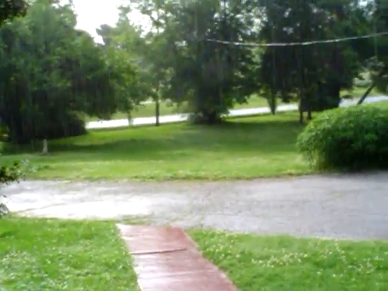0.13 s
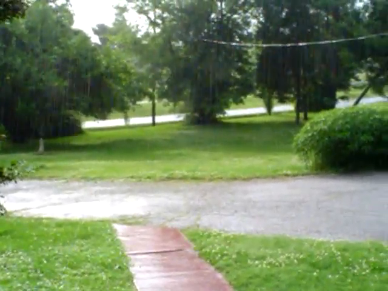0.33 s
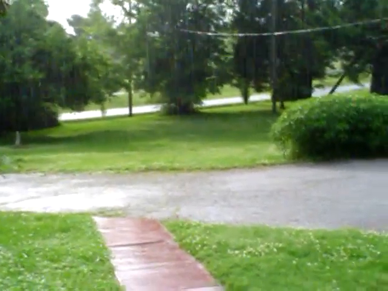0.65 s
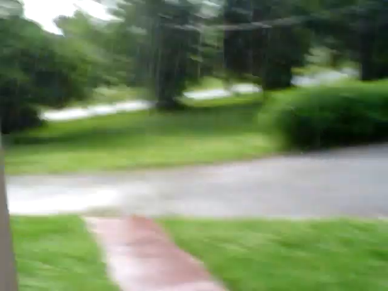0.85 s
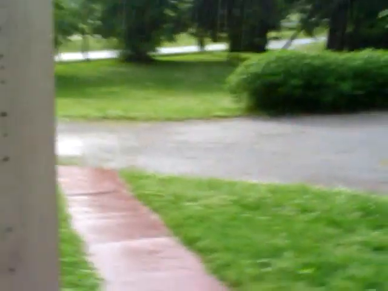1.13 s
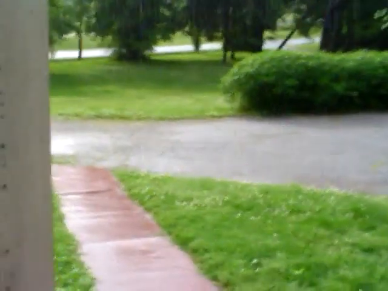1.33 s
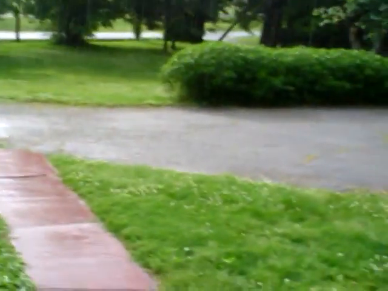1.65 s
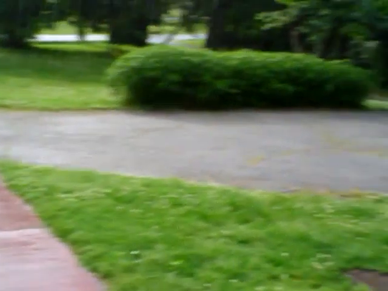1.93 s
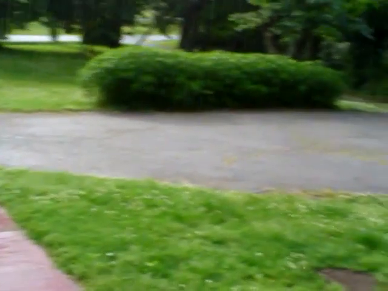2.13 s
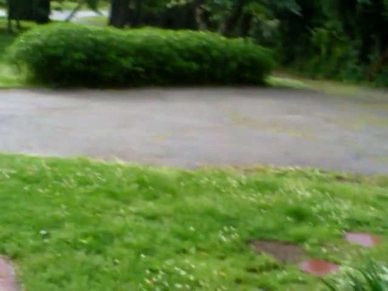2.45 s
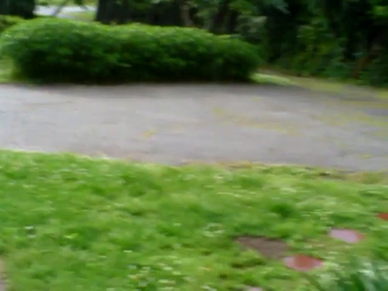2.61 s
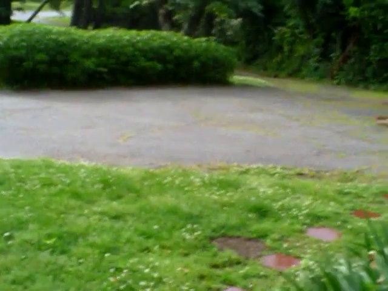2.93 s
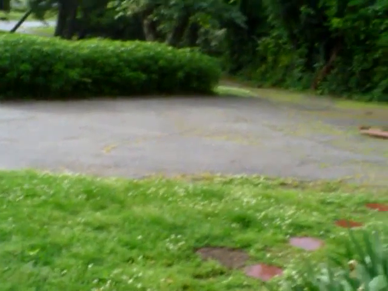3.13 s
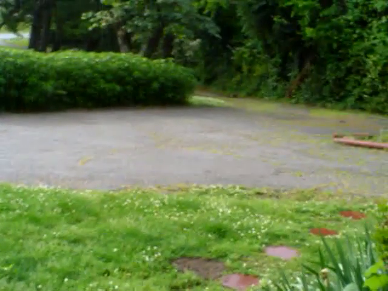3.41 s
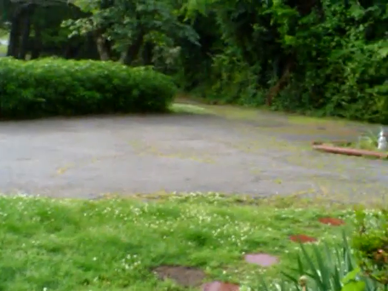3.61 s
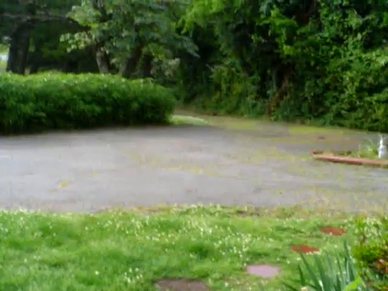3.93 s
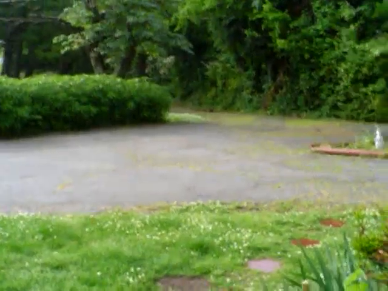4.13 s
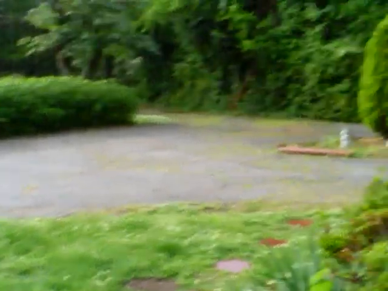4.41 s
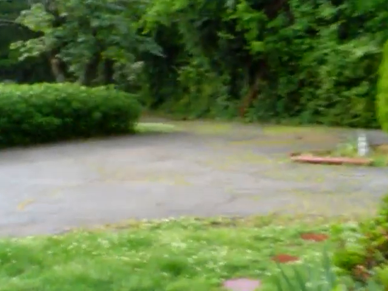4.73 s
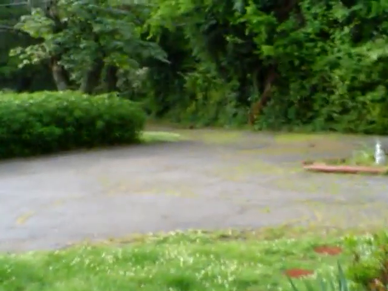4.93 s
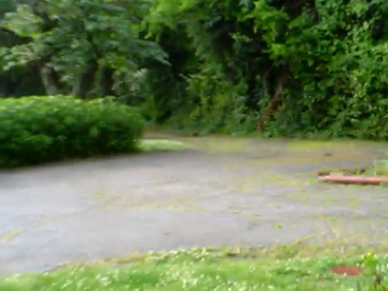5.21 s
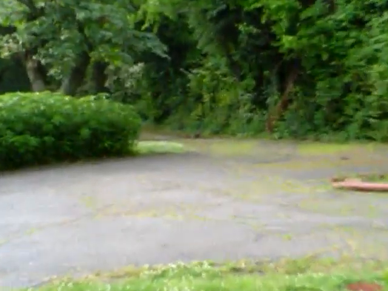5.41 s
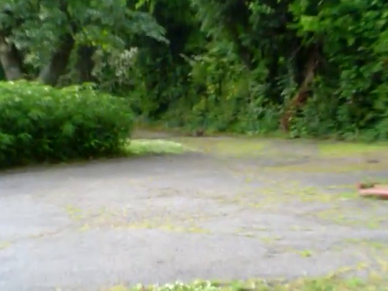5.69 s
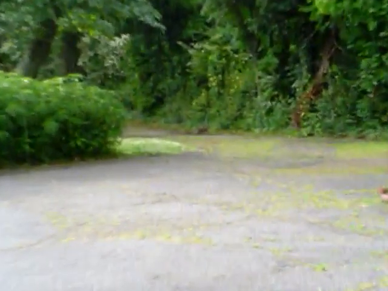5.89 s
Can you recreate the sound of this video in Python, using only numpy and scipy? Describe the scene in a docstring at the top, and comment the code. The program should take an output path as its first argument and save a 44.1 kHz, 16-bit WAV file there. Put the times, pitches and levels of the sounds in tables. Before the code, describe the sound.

Close, slightly dull handheld microphone under a porch in the rain. Continuous even hiss with small irregular ticks and splashes. Within the first second a violent handling pop is followed by a lesser bump; just after one second, something wooden raps once, dry and sharp with a very short tail. Afterwards the rain continues steadily, punctuated by scattered crisp drips and little bursts of spray until the end.

```python
"""Steady rain from a porch

Rain on grass and a paved drive: far drops merge into shaped noise, nearer ones patter as short rings and splashes,
and a few tap close by, with bursts of spray. The camera body is bumped (swinging pulses, trapped air, a click),
something wooden knocks once (decaying modes and noise), and a low sine hum sinks almost to nothing."""
import sys
import numpy as np
from scipy import signal
from scipy.fft import rfft, irfft, next_fast_len
from scipy.io import wavfile
from scipy.ndimage import uniform_filter1d

SR = 44100
rng = np.random.default_rng(int(sys.argv[2]) if len(sys.argv) > 2 else 0)


def master(y):
    """Save y as 16-bit WAV."""
    cut = np.clip(np.atleast_2d(y).T, -1, 1)
    pcm = np.round(cut * 32767)  # scale
    wavfile.write(sys.argv[1], SR, pcm.astype(np.int16))


N = 267136
T = np.arange(N) / SR  # seconds

# Low hum: start_s, pitch_hz, level_db
HUM_GLIDE = [(0, 137, -57), (.55, 139, -51), (1.2, 142, -53.5), (1.6, 143, -57), (2, 143.4, -70)]
# Ringing modes of the wood, balanced against each other: pitch_hz, level_db, t60_s
WOOD_MODES = [(280, -16, 0.095), (515, -17, .05), (640, -6, 0.053), (950, -14, .13), (1200, -12, .035),
              (1370, -7.5, .045), (1585, -7, 0.033), (1868, 1, 0.032), (2230, -11, .06), (2600, -13, .05),
              (2920, -10, 0.046), (3240, -7.5, 0.042), (3690, -13, .04), (4580, -5, .025), (7400, -17, .03)]
# The wooden blow and its bounces: delay_s after the knock, level_db, pitch_hz, t60_s
KNOCK_CONTACTS = [(0, 0, 1410, 0.0052), (.0023, -7, 1810, .012), (.0055, -18, 830, 0.027),
                  (.0095, -17.5, 924, 0.029), (.0245, -22, 1200, .015), (.033, -23, 950, .025)]
# Bumps on the camera body, negative pitch swings inward:
# peak_s, level_db, pitch_hz, rise_s, fall_s, slowing_per_s, air_push_db
BODY_BUMPS = [(.3583, -9.5, -1900, 0.00014, .00015, 1, -70), (.35955, 14, 585, .0004, 0.000087, 6000, -12),
              (.36, -8, -219, .00008, 0.0022, 66, -60), (.695, -10.5, -325, .00115, .002, 290, -60),
              (.3223, -25, -280, .0017, .0015, 1, -60)]
# Ring of the camera case: pitch_hz, level_db, t60_s
CASE_MODES = [(5770, -13, 0.0032), (9400, -11, .006)]
# Colour of the far rain, relative level per Hz: pitch_hz, level_db
RAIN_COLOUR = [(12, -40), (22, -12), (40, -14.5), (65, -9.5), (100, -6.5), (170, -9.5), (300, -5),
               (500, -1), (720, -3.5), (1180, -2), (1600, -4), (2600, -4.5), (3600, -8), (5300, -13.5),
               (6500, -11.5), (8500, -15.5), (10500, -17.5)]
# Slow tilt of the hiss, lifting the upper band as it lowers the lower one: start_s, tilt_db
HISS_TILT = [(0, 0.5), (.75, -1), (1.5, 1.5), (2.2, 1.5), (3, 0.2), (3.7, 0), (4.3, 0.5), (5, -1),
             (6.06, -1.5)]
# Bass of the hiss, of which only the movement about its mean is used: start_s, level_db
BASS_CURVE = [(0.0, -61), (0.34, -56), (0.71, -60), (2.58, -57.5), (3.02, -59), (3.39, -56), (5.53, -59.5),
              (5.74, -57), (6.06, -57)]
# Close drops: start_s, ring_db, pitch_hz, splash_db
CLOSE_DROPS = [(.113, -19.5, 1220, -38), (.189, -19, 2080, -36), (.27, -26, 3010, -29),
               (.284, -26, 1820, -28), (0.3873, -15, 2600, -33), (.3892, -20, 3600, -36),
               (.4738, -13, 1250, -23), (0.4757, -17, 1200, -32), (.54, -17.5, 1200, -36),
               (.5493, -15, 3200, -25), (.664, -20, 2500, -34), (.833, -23, 1210, -27),
               (.923, -19, 1220, -33), (1.247, -18, 2390, -33), (1.3942, -12, 2520, -30),
               (1.474, -20, 1110, -34), (1.985, -19, 1870, -32), (1.9997, -15, 3000, -32),
               (2.119, -26, 4870, -29), (2.135, -18, 2000, -33), (2.251, -21, 1200, -36),
               (2.741, -21, 3080, -30), (2.7683, -14, 6030, -21), (2.816, -21, 2500, -32),
               (2.83, -22, 3000, -34), (2.9735, -17, 1890, -32), (3.1365, -16, 2800, -29),
               (3.1548, -19, 2900, -34), (3.167, -20, 2100, -33), (3.182, -20, 1300, -31),
               (3.244, -19, 1050, -34), (3.7286, -10.5, 2300, -33), (3.741, -20, 1000, -36),
               (3.775, -19, 2360, -32), (3.784, -19, 3500, -32), (4.147, -18, 2550, -32),
               (4.2, -19, 1240, -30), (4.626, -17, 2130, -33), (5.0152, -30, 6840, -28),
               (5.0185, -24, 7000, -27), (5.057, -23, 3500, -36), (5.075, -21, 700, -40),
               (5.372, -22, 1300, -34), (5.384, -20, 1700, -38), (5.396, -20, 1100, -36),
               (5.46, -25, 3500, -32), (5.5265, -19, 1140, -31), (5.538, -17, 2200, -27),
               (5.614, -20, 1960, -33), (5.633, -18, 2500, -30), (5.695, -27, 2200, -30),
               (5.712, -21, 2200, -30), (5.855, -20, 2030, -32)]
# Bursts of spray: start_s, level_db, low_hz, high_hz, t60_s
SPRAY_BURSTS = [(.237, -18, 1100, 3160, 0.078), (.4737, -20.5, 3500, 7000, 0.0092),
                (2.766, -28.5, 4500, 9500, 0.079), (3.133, -31, 1800, 4490, .08),
                (5.36, -28, 1000, 4500, .2), (5.534, -26, 900, 4800, .07), (5.694, -30, 6000, 9900, 0.088),
                (5.85, -32, 1200, 4000, .08)]

KNOCK_S, KNOCK_RING_PEAK_DB, KNOCK_RISE_S = 1.119, -9, .0002
RATTLE_DB, RATTLE_T60_S = -22, 0.12
CRACK_DB, CRACK_T60_S = -17, .022
PORCH_DB, PORCH_T60_S = -32, 0.29
PUSH_RISE_S, PUSH_LEAK_S = 0.0027, 0.017
REBOUND, REBOUND_S = 0.51, 0.03  # share of the air push, decay
CLICK_S, RUSTLE_DB, RUSTLE_DECAY_S = .3563, -17, .0008
HISS_DB = -34  # rms
TILT_UP_HZ, TILT_DOWN_HZ, BASS_TOP_HZ = 1190, 497, 150
PATTER_FLOOR_DB, PATTER_SPREAD_DB = -35, 3.5
PATTER_SPLASH_DB, PATTER_CLUMP_DB = -11, 2.2  # splash against ring, size of the clumping
DROP_T60_S, SPLASH_T60_S = 0.0049, 0.0071  # the drop's ring time is for 2500 Hz
OVERTONE, OVERTONE_DB = 1.44, -8  # second ring of a drop: multiple of the pitch, level against the first
SPRAY_RISE = 0.086  # share of t60
TOP_HZ, CLIP_LEVEL = 10090, 1.04


def undb(db):
    """Decibels to gain."""
    return 10 ** (np.asarray(db) / 20)


def unit(x):
    """Scale to rms 1."""
    return x / np.sqrt(np.mean(x ** 2))


def band(x, lo_hz, hi_hz):
    """Band-pass."""
    edges = [lo_hz, min(hi_hz, .45 * SR)]
    return signal.sosfilt(signal.butter(2, edges, "band", fs=SR, output="sos"), x)


def walk(rate):
    """Random levels held 1 / rate s and slewed twice; spread near 1."""
    hold = int(SR / rate)
    steps = np.repeat(rng.standard_normal(N // hold + 1), hold)
    return 1.3 * uniform_filter1d(uniform_filter1d(steps, hold), hold)[:N]


def flicker(rate):
    """Quick random level changes with little slow drift; rms 1."""
    quick = walk(rate)
    return unit(quick - uniform_filter1d(quick, int(6 * SR / rate)))


def add(out, s, sound):
    """Mix a short sound in at time s."""
    i = int(s * SR)
    out[i:i + len(sound)] += sound[:N - i]


def hum():
    """A sine creeps up in pitch, swells, then sinks, its level wavering slightly."""
    s, hz, db = np.transpose(HUM_GLIDE)
    level = np.sqrt(2) * undb(np.interp(T, s, db) + .8 * walk(5))
    phase = 2 * np.pi * np.cumsum(np.interp(T, s, hz)) / SR
    return level * np.sin(phase)


def knock():
    """A hard blow cracks and rings the wood; a noisy rattle and the porch walls carry it on."""
    t = np.arange(SR // 3) / SR
    ring = sum(undb(db - 60 * t / t60) * np.sin(2 * np.pi * hz * t) for hz, db, t60 in WOOD_MODES)
    ring = band(ring * (1 - np.exp(-t / KNOCK_RISE_S)), 170, 12000)  # a small object radiates no bass
    ring = undb(KNOCK_RING_PEAK_DB) * ring / np.abs(ring).max()
    blow = 0
    for delay, db, hz, t60 in KNOCK_CONTACTS:
        since = t - delay
        blow = blow + undb(db - 60 * since / t60) * np.sin(2 * np.pi * hz * since) * (since >= 0)
    blow = band(blow, 280, 12000)
    noise = rng.standard_normal((3, len(t)))
    rattle = undb(RATTLE_DB - 60 * t / RATTLE_T60_S) * unit(band(noise[0], 500, 6000))
    crack = undb(CRACK_DB - 60 * t / CRACK_T60_S) * unit(band(noise[1], 2700, 11000))
    porch = undb(PORCH_DB - 60 * t / PORCH_T60_S) * unit(band(noise[2], 400, 3200))
    out = np.zeros(N)
    add(out, KNOCK_S, -ring - blow + rattle + crack + porch)
    return out


def bumps():
    """The membrane swings briefly, slowing as it settles; trapped air pushes, leaks and rebounds."""
    out = 0
    for s, db, hz, rise, fall, slowing, push_db in BODY_BUMPS:
        t = T - s
        after = np.maximum(t, 0)
        shape = np.exp(-.5 * (t / np.where(t < 0, rise, fall)) ** 2)
        phase = 2 * np.pi * abs(hz) * np.where(t < 0, t, np.log1p(slowing * after) / slowing)
        swing = undb(db) * np.sign(hz) * shape * np.cos(phase)
        leak = np.exp(-after / PUSH_LEAK_S) - REBOUND * np.exp(-after / REBOUND_S)
        push = undb(push_db) * 2 * (1 - np.exp(-(after / PUSH_RISE_S) ** 2)) * leak
        out = out + swing + push
    return out


def case_click():
    """The case clicks just before the hardest bump: a noise rustle swells and dies as two modes ring."""
    envelope = np.exp(-np.abs(T - CLICK_S) / RUSTLE_DECAY_S)
    out = undb(RUSTLE_DB) * envelope * unit(band(rng.standard_normal(N), 3000, 11000))
    t = np.arange(SR // 100) / SR
    ring = sum(undb(db - 60 * t / t60) * np.cos(2 * np.pi * hz * t) for hz, db, t60 in CASE_MODES)
    add(out, CLICK_S, -ring)
    return out


def hiss():
    """Countless far drops: half-octave noise bands that swell together and flicker alone."""
    tilt, bass = (np.interp(T, *np.transpose(curve)) for curve in (HISS_TILT, BASS_CURVE))

    def near(hz, centre_hz):
        """Weight of a band by its distance from a centre in octaves."""
        return np.exp(-(np.log2(hz / centre_hz) / .5) ** 2)

    size = next_fast_len(N)
    f = np.fft.rfftfreq(size, 1 / SR) + 1  # 1 Hz up, to keep the logarithm finite
    colour_hz, colour_db = np.transpose(RAIN_COLOUR)
    colour = undb(np.interp(np.log(f), np.log(colour_hz), colour_db))
    noise = rfft(rng.standard_normal(size)) * colour
    gust = flicker(50)  # shared by all bands
    out = 0
    for hz in 20 * 2 ** np.arange(0, 9.6, .5):
        share = np.cos(np.pi / 2 * np.clip(2 * np.log2(f / hz), -1, 1)) ** 2
        treble = np.clip(np.log2(hz / 3000), 0, 1)  # the top bands flicker most
        db = tilt * (near(hz, TILT_UP_HZ) - near(hz, TILT_DOWN_HZ))
        db = db + (bass - bass.mean()) / (1 + (hz / BASS_TOP_HZ) ** 4)
        db = db + (0.45 + 0.37 * treble) * gust
        db = db + (.4 + 1.37 * treble) * flicker(90) + 1.05 * treble * flicker(24.98)
        out = out + undb(db) * irfft(noise * share, size)[:N]
    return unit(out) * undb(HISS_DB)


def drop(db, hz, t60, splash_db, noise):
    """A drop ticks briefly on the surface it hits and splashes in a short bright burst."""
    t = np.arange(noise.shape[-1]) / SR
    tone = np.sin(2 * np.pi * hz * t)
    overtone = undb(OVERTONE_DB) * np.sin(2 * np.pi * OVERTONE * hz * t)
    ring = -undb(db) * (tone + overtone) * undb(-60 * t / t60)
    splash = undb(splash_db) * unit(band(noise, 3000, 11000)) * undb(-60 * t / SPLASH_T60_S)
    return (1 - np.exp(-t / .0001)) * (ring + splash)  # softened onset


def patter(count=1800):
    """Mid-distance drops of random pitch and size, some larger than the rest, swelling in clumps."""
    out = np.zeros(N)
    when, pitch, bulk, length = rng.random((count, 4, 1)).transpose(1, 0, 2)
    db = PATTER_FLOOR_DB - PATTER_SPREAD_DB * np.log(1 - .9 * bulk)
    hz = 550 * 7.5 ** pitch
    t60 = (0.0031 + .006 * length) * np.sqrt(1500 / hz)  # low drops ring longer
    ticks = drop(db, hz, t60, db + PATTER_SPLASH_DB, rng.standard_normal((count, 700)))
    for s, tick in zip(when[:, 0] * N / SR, ticks):
        add(out, s, tick)
    return band(out, 400, 15000) * undb(PATTER_CLUMP_DB * walk(24.97))


def sprays():
    """Drips burst into spray: band-limited noise with a quick rise and an exponential decay."""
    out = np.zeros(N)
    t = np.arange(SR // 8) / SR
    noises = rng.standard_normal((len(SPRAY_BURSTS), len(t)))
    for (s, db, lo_hz, hi_hz, t60), noise in zip(SPRAY_BURSTS, noises):
        envelope = undb(db - 60 * t / t60) * np.minimum(t / (SPRAY_RISE * t60), 1)
        add(out, s, envelope * unit(band(noise, lo_hz, hi_hz)))
    return out


def close_drops():
    """Single taps near the microphone, the low ones ringing longer."""
    out = np.zeros(N)
    noises = rng.standard_normal((len(CLOSE_DROPS), 1000))
    for (s, db, hz, splash_db), noise in zip(CLOSE_DROPS, noises):
        add(out, s, drop(db, hz, DROP_T60_S * np.sqrt(2500 / hz), splash_db, noise))
    return band(out, 300, 15000)


def scene():
    """Everything at the one microphone."""
    incidents = hum() + knock() + bumps() + case_click()
    rain = hiss() + patter() + sprays() + close_drops()
    return (incidents + rain)[None]


def record(dry):
    """Peaks are clipped just above full scale, then a steep low-pass cuts the top."""
    clipped = np.clip(dry, -CLIP_LEVEL, CLIP_LEVEL)
    return signal.sosfiltfilt(signal.ellip(12, .15, 60, TOP_HZ, fs=SR, output="sos"), clipped)


dry = scene()
out = record(dry)
master(out)
```